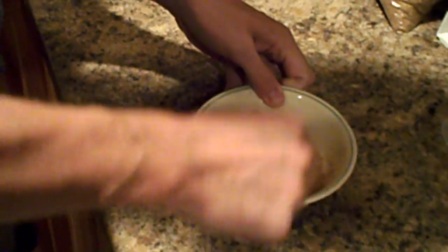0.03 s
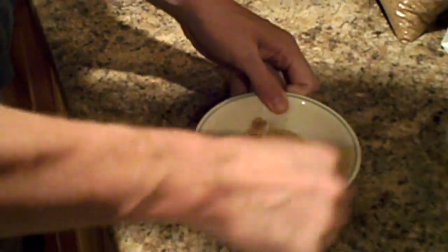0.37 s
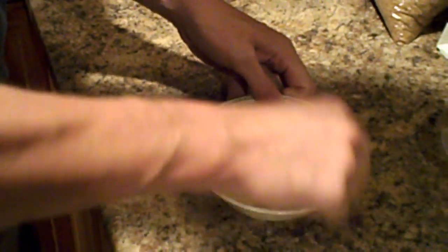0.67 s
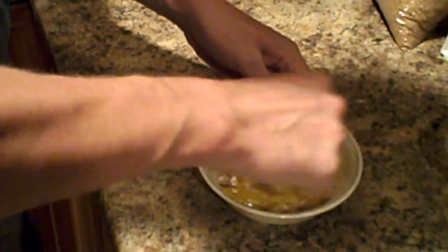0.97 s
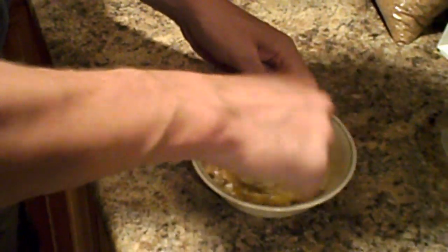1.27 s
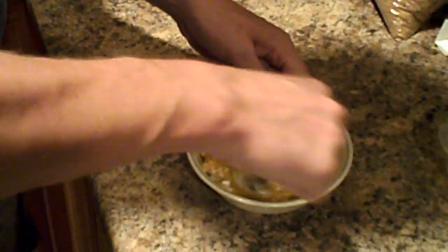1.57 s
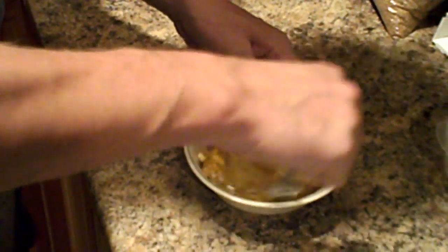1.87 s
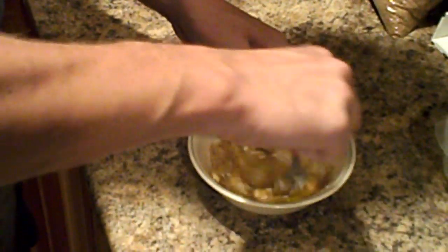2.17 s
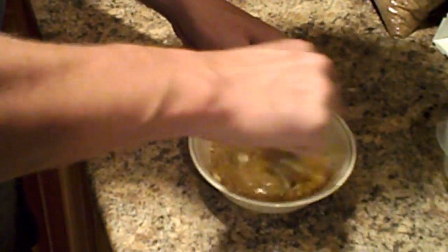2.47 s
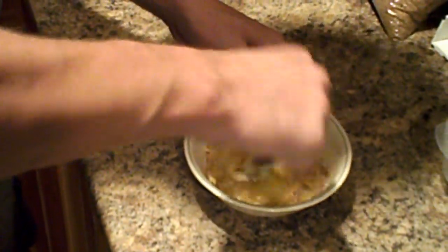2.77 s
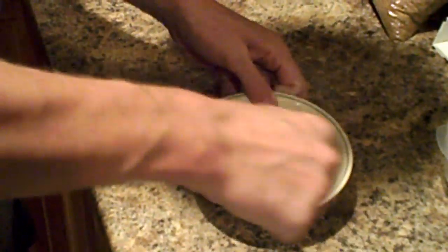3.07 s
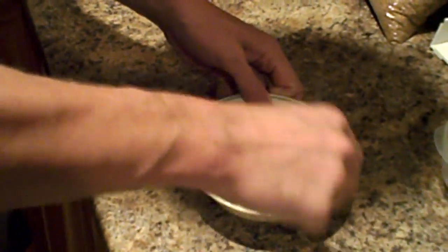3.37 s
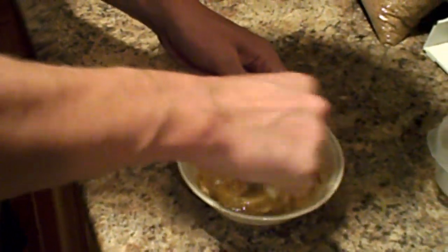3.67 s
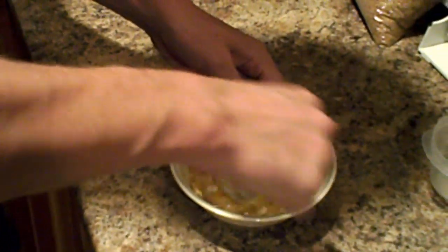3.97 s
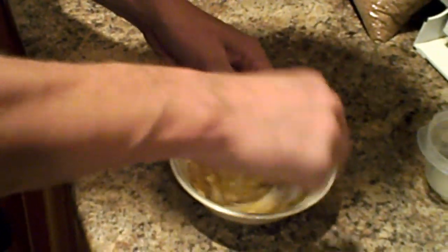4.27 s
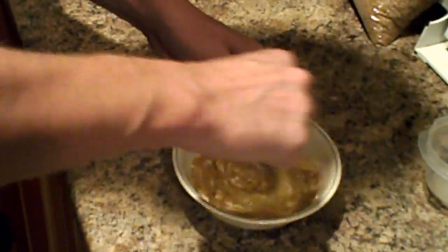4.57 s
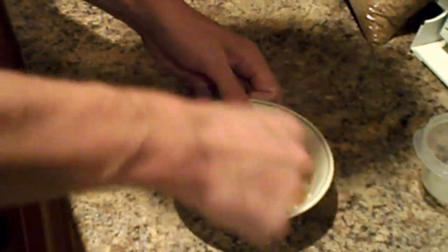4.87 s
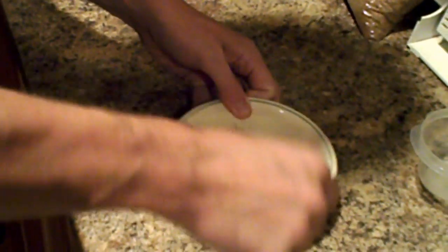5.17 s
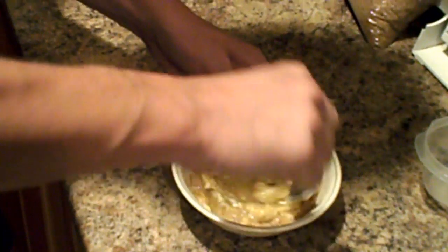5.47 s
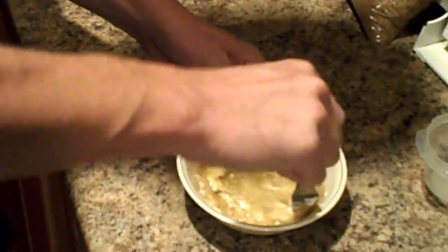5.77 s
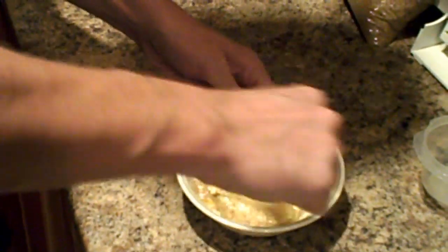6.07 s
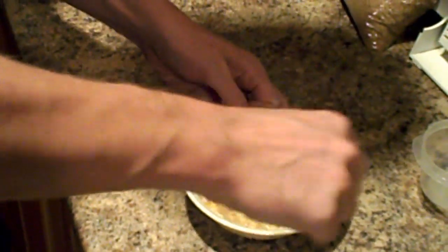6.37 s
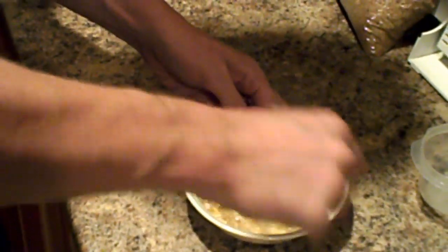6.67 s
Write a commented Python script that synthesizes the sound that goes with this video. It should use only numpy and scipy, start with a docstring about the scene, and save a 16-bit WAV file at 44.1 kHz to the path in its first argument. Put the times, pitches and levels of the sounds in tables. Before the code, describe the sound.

A fork stirs thick batter in a ceramic bowl on a stone kitchen counter, close to the microphone. For the first two and a half seconds the bowl knocks dully on the counter about four times a second, while the tines clink on its wall, most clearly at 0.8 and 1.8 seconds. Between the blows the batter smacks softly off the fork and crackles with tiny bursting air pockets. Three sharp, briefly ringing clinks come between 3 and 3.5 seconds. From about 3.7 to 4.7 seconds, five soft, wet sweeps swish through the batter, with a couple of faint bumps. The loudest clink lands at 5.3 seconds, followed by a lighter tap. Quiet squishing continues until another hard clink at 6.5 seconds. The room adds short reflections, and a faint, low appliance hum with a steady rush of air lies behind everything.

```python
"""A kitchen, one microphone close to a ceramic bowl held on a stone counter; a fork stirs thick batter.
At first the strokes make the bowl knock dully on the counter, and the tines clink on its wall.
Between the blows the batter smacks off the tines and crackles as its air pockets burst.
Around four seconds in, five deep sweeps swish through it; then come two more hard clinks.
A low appliance hum lies behind it all."""
import sys
import numpy as np
from scipy import signal
from scipy.fft import rfft, irfft
from scipy.io import wavfile

SR = 44100
rng = np.random.default_rng(int(sys.argv[2]) if len(sys.argv) > 2 else 0)


def transcribe(u):
    """Save the signal u as a 16-bit wav file named by the first command-line argument.

    u: samples, shape (n,) or (channels, n), limited to [-1, 1]; the rate is SR.
    q: integer samples, one column per channel.
    """
    v = np.clip(np.atleast_2d(u).T, -1, 1)
    q = np.round(v * 32767).astype(np.int16)
    wavfile.write(sys.argv[1], SR, q)


N = 296793

# tines hitting the wall: t/s, level/dB, bass/dB, top/dB, freedom to ring/dB, favoured f/Hz
CLINK_HITS = [(0.396, -39.5, -5, 4.5, -32, 4960), (0.5323, -40.5, -1.5, -10.5, -13, 5400),
              (0.781, -31, 0.5, -2.5, -1.5, 5870), (0.891, -45, 7.5, 6, -18, 4570),
              (1.774, -30, -2, 3.5, 1, 6800), (2.9917, -25.5, -4.5, -2.5, -0.5, 3100),
              (3.2516, -29.5, -2.5, -1.5, 1, 6500), (3.3613, -48.5, -15, 0, -4, 2090),
              (3.4794, -28.5, -1, -3.5, 2, 2110), (5.2647, -23, -4.5, 4, 1.5, 6500),
              (5.3932, -33, 4.5, 5.5, -25, 5200), (6.496, -25, -3, -1.5, -1, 3060),
              (6.6276, -47.5, -5, 2, -14, 2080)]
# modes of bowl and fork: f/Hz, level/dB, t60/s
BOWL_MODES = [(1248, -28, 0.099), (1436, -0.5, 0.064), (1710, -0.5, 0.18), (2040, -0.5, 0.27),
              (2225, -15, 0.38), (3032, -2.5, 0.091), (3164, -2.5, 0.16), (4600, -3, 0.077),
              (4480, 9, 0.071), (5480, 1.5, 0.13), (6724, 16.5, 0.025), (6980, 4, 0.081), (7450, -2, 0.09),
              (9150, 0, 0.25), (11530, -2, 0.08)]
# spectrum of tearing batter: f/Hz, level/dB
TEARING_COLOUR = [(120, -39), (350, 11), (800, -3), (1300, 5.5), (2100, 8), (2900, -2), (4800, -1.5),
                  (8000, -7), (11200, 0), (13000, -15), (16000, -17)]


def clinks(ring_db=-6.5, favour_db=4, treble_db=-1.0, thump_db=-43, thump_hz=48):
    """Steel chatters on glaze for a few ms, sets the bowl ringing and pushes it on the counter."""
    # spectrum of steel on glaze: f/Hz, level/dB
    crack_colour = [(88, -47), (150, -26.5), (340, -7), (601, -1), (774, -7.5), (1140, -1), (1530, -4),
                    (2060, -1), (3100, -16.5), (3490, -18), (4580, -4), (6140, -13), (6770, -10.5),
                    (7920, -20), (9260, -15.5), (16000, -36)]
    out, t = np.zeros(N), np.arange(SR // 2) / SR
    for s, db, bass_db, top_db, free_db, hz in CLINK_HITS:
        tone = (bass_db, treble_db, top_db)
        crack = blow_sized(coloured(rattle(t, hold_s=0.0032, t60=0.054), crack_colour, tone))
        # an uneven wall splits each mode in two
        ring = sum(ringing(BOWL_MODES, t, spread_db=0.5, detune=0.0064) for _ in range(2))
        ring = ring + amp(favour_db) * resonance(ring, hz, width_hz=600)  # each spot favours some modes
        ring = blow_sized(coloured(ring, [(80, -37), (700, -3)], tone))  # the ring carries little bass
        thump = blow_sized(np.sin(2 * np.pi * thump_hz * t) * np.exp(-t / 0.0045))
        add(out, s, amp(db) * (crack + amp(ring_db + free_db) * ring + amp(thump_db) * thump))
    return out


def knocks(firm_db=-29, bass_per_softness=.55, bass_per_hardness=-0.01, top_db=-1.0):
    """The bowl bumps the counter, cushioned by batter and hand: no ring, and the softer, the deeper."""
    # bumps of the bowl: t/s, level/dB, hardness/dB
    bumps = [(0.1921, -28, 5.5), (0.2053, -30.5, 2), (0.4092, -29.5, 9.5), (0.4156, -29.5, -22),
             (0.669, -31.5, 5), (0.957, -41.5, 7), (1.21, -44.5, -3), (1.3724, -32, 5), (1.6286, -28, 6.5),
             (1.894, -31.5, 12), (1.905, -37.5, -9), (2.15, -36, 6), (2.4121, -37.5, 10.5),
             (4.48, -48.5, 4), (4.7149, -44.5, 14), (5.667, -43, 6)]
    # spectrum of cushioned ceramic on stone: f/Hz, level/dB
    knock_colour = [(59, -66), (100, -35), (335, -3.5), (621, 1), (768, 0.5), (1150, 1.5), (1720, -1.5),
                    (2420, -21.5), (2690, -16), (3120, -25.5), (3780, -23), (5190, -38.5), (10000, -41),
                    (16000, -54)]
    out, t = np.zeros(N), np.arange(SR // 4) / SR
    for s, db, hard_db in bumps:
        bass_db = bass_per_softness * (firm_db - db) + bass_per_hardness * hard_db
        tone = (bass_db, hard_db, hard_db + top_db)
        knock = coloured(rattle(t, hold_s=0.0057, t60=0.083), knock_colour, tone)
        add(out, s, amp(db) * blow_sized(knock))
    return out


def smacks(hard_clink_db=-31.0):
    """Batter pulls off the tines, and is squeezed from the wall ahead of each hard clink."""
    # batter letting go: t/s, level/dB, fade/s, air pocket f/Hz, top/dB
    pulls = [(0.1816, -47, 0.006, 4800, 7), (0.657, -48, .006, 1760, -6), (0.946, -55.5, 0.0081, 4600, 14),
             (1.197, -53, .011, 1330, 2), (1.352, -51, .027, 1400, 6), (1.5784, -55, 0.0041, 4800, 11),
             (1.612, -50, 0.019, 1430, 6), (1.883, -52.5, 0.012, 3480, 1), (2.166, -57, .007, 4720, 5),
             (2.311, -57.5, 0.024, 4600, 17), (2.494, -62, 0.0046, 5530, 20), (2.613, -57, .019, 5400, 17),
             (2.728, -48, 0.021, 4500, -0.5), (2.877, -53, .01, 5100, -5), (3.695, -53, 0.032, 2120, -3),
             (3.812, -52, 0.022, 3470, 4), (4.035, -46, 0.022, 1350, 6), (4.25, -48.5, 0.017, 1320, 5),
             (4.472, -45.5, 0.011, 3640, -3), (4.668, -53.5, 0.0047, 4900, 0),
             (4.702, -47.5, 0.019, 3600, -3.5), (4.802, -58.5, 0.01, 5000, 11),
             (4.938, -49.5, 0.02, 1200, -2.5), (5.047, -58, 0.0068, 5030, 14),
             (5.1663, -46, 0.0057, 1850, 2), (5.632, -59, 0.0078, 4770, 19),
             (5.811, -53.5, 0.025, 4970, 6.5), (5.9859, -63.5, 0.0035, 4930, 18),
             (6.0458, -53.5, 0.0079, 3620, -8), (6.206, -58.5, 0.014, 5000, 19),
             (6.349, -40.5, .013, 1070, -8)]
    # batter squeezed out: lead/s, level/dB, fade/s, air pocket f/Hz, top/dB
    squeeze = (0.27, -53.5, 0.6, 4801, 4)
    out = np.zeros(N)
    for s, *shape in pulls:
        add(out, s, smack(*shape))
    lead_s, *shape = squeeze
    for s, db, *_ in CLINK_HITS:
        if db > hard_clink_db:
            add(out, s - lead_s, smack(*shape))
    return out


def smack(db, fade_s, pocket_hz, top_db, pocket_db=11, bass_db=-3, plain_db=-44):
    """Films of batter tear in a flurry of at most 1/6 s; the air pocket that opens gives it a pitch."""
    t = np.arange(SR // 6) / SR
    treble_db = 0.86 * (plain_db - db)  # smaller smacks tear thinner films
    flurry = pops(len(t), per_s=3500, spread_db=4) * np.exp(-(t / fade_s) ** 2)
    flurry = flurry + amp(pocket_db) * resonance(flurry, pocket_hz, width_hz=300)
    return amp(db) * blow_sized(coloured(flurry, TEARING_COLOUR, (bass_db, treble_db, top_db)))


def swishes(half_length_s=0.025, hollow_db=5):
    """The tines plough a furrow: dense tearing swells and fades, coloured by the hollow behind them."""
    # deep sweeps, about four a second: middle t/s, level/dB
    sweeps = [(3.72, -56), (3.945, -53), (4.16, -47), (4.39, -46), (4.62, -49)]
    out, t = np.zeros(N), np.arange(SR // 5) / SR
    middle = t.mean()
    swell = np.exp(-((t - middle) / half_length_s) ** 2)
    for s, db in sweeps:
        tearing = pops(len(t), per_s=9000, spread_db=3) * swell
        tearing = tearing + amp(hollow_db) * resonance(tearing, hz=2100, width_hz=900)
        swish = coloured(tearing, TEARING_COLOUR, tone_db=(-9, -1, -9))
        add(out, s - middle, amp(db) * blow_sized(swish))
    return out


def batter(crackle_db=-1, wall_db=-12, wall_damping_s=.004):
    """As the fork drags, large pockets squish, tiny ones crackle and the smothered bowl rings faintly."""
    # how hard the fork drags: t/s, level/dB
    effort = [(0, -80), (1.12, -79), (1.48, -64.5), (1.75, -64), (2.08, -89), (2.38, -63.5), (2.62, -58),
              (2.84, -71), (3.62, -64), (4.3, -60), (4.76, -60.5), (4.89, -78), (5.04, -66), (5.58, -77),
              (5.78, -68), (5.93, -79), (6.1, -66), (6.7, -68)]
    # spectrum of the large pockets: f/Hz, level/dB
    squish_colour = [(150, -28), (400, -3), (800, -3), (1400, 5), (1750, -5.5), (2100, 2.5), (2800, 2),
                     (4000, -9), (9000, -48)]
    # spectrum of the tiny pockets: f/Hz, level/dB
    crackle_colour = [(800, -45), (2800, -13), (4300, 0.5), (5600, 2.5), (6800, -8), (9000, -5.5),
                      (11300, -3), (12500, -18), (16000, -16)]
    t = np.arange(N) / SR
    drag = amp(np.interp(t, *np.transpose(effort)))
    large = bubbles(341, 3318, cycles=8.9, per_s=1800, spread_db=3, spurt_db=5.5)
    tiny = bubbles(2614, 14230, cycles=11.0, per_s=5600, spread_db=3.5, spurt_db=4.5)
    squish = unit_rms(coloured(large, squish_colour))
    crackle = unit_rms(coloured(tiny, crackle_colour))
    wet = drag * (squish + amp(crackle_db) * crackle)
    brief = t[:SR // 10]
    smothered_ring = ringing(BOWL_MODES, brief) * np.exp(-brief / wall_damping_s)
    wall = signal.oaconvolve(wet, smothered_ring)[:N]
    return wet + amp(wall_db) * wet.std() * unit_rms(wall)


def bubbles(low_hz, high_hz, cycles, per_s, spread_db, spurt_db, tearing_db=3.5, sizes=24):
    """Air pockets of many sizes burst in clumps, each ringing for a few cycles."""
    out, t = np.zeros(N), np.arange(SR // 40) / SR
    shared_db = tearing_db * clumps(per_s=55)  # films tear in bursts that all sizes share
    for hz in np.geomspace(low_hz, high_hz, sizes):
        grain = np.sin(2 * np.pi * hz * t) * np.exp(-hz * t / cycles) * np.sqrt(hz)
        own_db = spurt_db * clumps(per_s=30)
        bursts = pops(N, per_s / sizes, spread_db) * amp(shared_db + own_db)
        out += signal.oaconvolve(bursts, grain)[:N]
    return unit_rms(out)


def kitchen(x, gap_s=.005, corner_db=-21):
    """The room at the microphone: reflections, each band dying at its own speed, and standing waves."""
    # decay of the reflections: f/Hz, t60/s
    room_decay = [(200, 0.5), (530, 0.39), (1400, 0.3837), (3700, 0.43), (10000, 0.29), (16000, 0.34)]
    # strength of the reflections: f/Hz, level/dB
    room_colour = [(100, 1), (400, -1.5), (1500, -3), (3500, -7), (7000, -7.5), (14000, -10)]
    # standing waves of the counter corner: f/Hz, level/dB, t60/s
    corner_modes = [(355, -8, 0.18), (400.6, -3, 0.52), (535.5, 2.5, 0.087), (650.5, 2.5, 0.26),
                    (696, -0.5, 0.24), (885, -1.5, 0.2)]
    t = np.arange(SR // 2) / SR
    echoes = rng.standard_normal(len(t)) * (rng.random(len(t)) < .15) * (t > gap_s)
    hz, frame_s, bands = signal.stft(echoes, SR, nperseg=256)
    decay_per_s = np.log(1000) / curve_at(room_decay, hz)[:, None]
    unit_energy = np.sqrt(2 * decay_per_s / SR) / echoes.std()
    bands = bands * np.exp(-decay_per_s * frame_s) * unit_energy
    tail = signal.istft(bands * amp(curve_at(room_colour, hz))[:, None], SR)[1][:len(t)]
    waves = ringing(corner_modes, t)
    return signal.oaconvolve(x, tail + amp(corner_db) * waves / np.linalg.norm(waves))[:N]


def appliance(waver_rad=0.22, air_db=-56.5):
    """In the background, a steady rush of air with slightly wavering motor tones."""
    # motor tones: f/Hz, rms level/dB
    motor_tones = [(240.3, -66), (269, -69.5), (404, -74), (455, -71.5)]
    # spectrum of the rushing air: f/Hz, level/dB
    air_colour = [(15, -62), (25, -31.5), (127, -20), (180, -24.5), (217, -9.5), (335, -9), (463, -2),
                  (591, -9), (734, -6), (840, -9), (1650, -12.5), (2690, -23), (4490, -27), (4870, -28.5),
                  (16000, -42.5)]
    hum, t = np.zeros(N), np.arange(N) / SR
    knots = np.linspace(0, t[-1], num=30)
    for hz, db in motor_tones:
        waver = waver_rad * np.interp(t, knots, rng.standard_normal(len(knots)))
        hum += amp(db) * np.sqrt(2) * np.sin(2 * np.pi * hz * t + waver)
    air_gain = amp(curve_at(air_colour, np.fft.rfftfreq(N, 1 / SR)))
    air = irfft(rfft(rng.standard_normal(N)) * air_gain, N)
    return hum + amp(air_db) * unit_rms(air)


def ringing(modes, t, spread_db=0, detune=0):
    """Dying sines; spread and detune scatter their strength and pitch from blow to blow."""
    hz, db, t60 = np.transpose(modes)[:, :, None]
    db = db + spread_db * rng.standard_normal(hz.shape)
    hz = hz * (1 + detune * rng.standard_normal(hz.shape))
    envelopes = amp(db) * np.exp(-np.log(1000) * t / t60)
    return (envelopes * np.sin(2 * np.pi * (hz * t + rng.random(hz.shape)))).sum(0)


def rattle(t, hold_s, t60):
    """A dense cluster of quickly damped modes: even in spectrum, held briefly, then dying."""
    envelope = np.exp(-np.log(1000) * np.maximum(t - hold_s, 0) / t60)
    burst = rfft(rng.standard_normal(len(t)) * envelope)
    return irfft(burst / np.sqrt(abs(burst) + 1e-9), len(t)) * np.sqrt(envelope)


def pops(samples, per_s, spread_db):
    """Random clicks of either sign, mostly small with a few large ones."""
    fires = rng.random(samples) < per_s / SR
    size = np.minimum(rng.exponential(1, samples), 4)
    return fires * rng.choice([-1, 1], samples) * amp(spread_db * size)


def clumps(per_s):
    """A level that wanders about zero, through per_s random values a second."""
    knots = np.clip(rng.standard_normal(int(N / SR * per_s) + 2), -2, 2)
    return np.interp(np.arange(N) * per_s / SR, np.arange(len(knots)), knots)


def resonance(x, hz, width_hz):
    """One damped resonance of gain 1 at its centre."""
    return signal.lfilter(*signal.iirpeak(hz, hz / width_hz, fs=SR), x)


def coloured(x, colour, tone_db=(0, 0, 0), size=4096):
    """Causal filter: a spectrum, tilted in bass, treble and top against its middle."""
    # centres of bass, middle, treble and top: f/Hz
    band_centres = [550, 1600, 5000, 10500]
    hz = np.fft.rfftfreq(size, 1 / SR)
    bass, treble, top = tone_db
    tilt = list(zip(band_centres, (bass, 0, treble, top)))
    gain = amp(curve_at(colour, hz) + curve_at(tilt, hz))
    log_gain = np.log(np.r_[gain, gain[-2:0:-1]])
    taps = np.fft.ifft(np.exp(np.conj(signal.hilbert(log_gain)))).real[:size // 2]  # minimum phase
    return signal.oaconvolve(x, taps)[:len(x)]


def curve_at(points, hz):
    """Interpolates (f/Hz, value) points along log frequency."""
    f, value = np.transpose(points)
    return np.interp(np.log(hz + 1), np.log(f + 1), value)


def blow_sized(x):
    """Scales a blow so that its energy, spread over 30 ms, has rms 1."""
    return x * np.sqrt(.03 * SR / np.sum(x ** 2))


def unit_rms(x):
    return x / np.sqrt(np.mean(x ** 2) + 1e-20)


def amp(db):
    return 10 ** (np.asarray(db) / 20)


def add(mix, s, sound):
    part = mix[max(round(s * SR), 0):][:len(sound)]
    part += sound[:len(part)]


def scene():
    """In mono: bowl and batter up close, the kitchen around them, the hum behind."""
    bowl = clinks() + knocks() + smacks() + swishes() + batter()
    return (bowl + kitchen(bowl) + appliance())[None]


def record(dry, edge_hz=16200):
    """The microphone signal passes the recorder's steep upper band limit."""
    low_pass = signal.firwin(511, edge_hz, window=("kaiser", 9), fs=SR)
    return signal.oaconvolve(dry, low_pass[None], "same")


dry = scene()
out = record(dry)
transcribe(out)
```